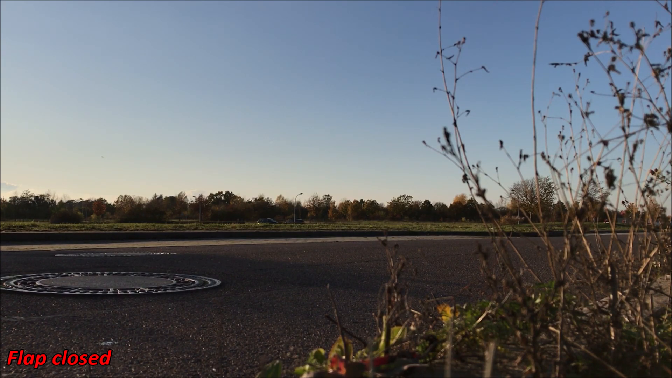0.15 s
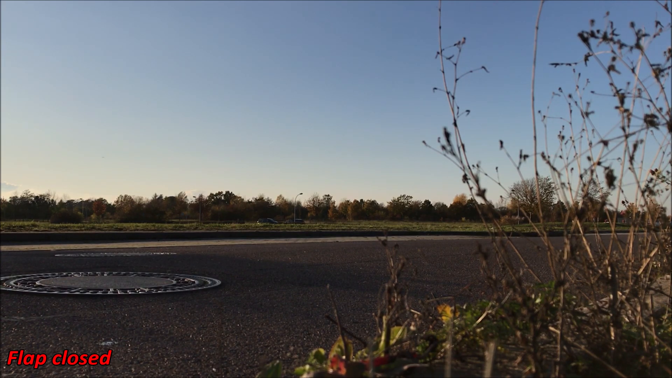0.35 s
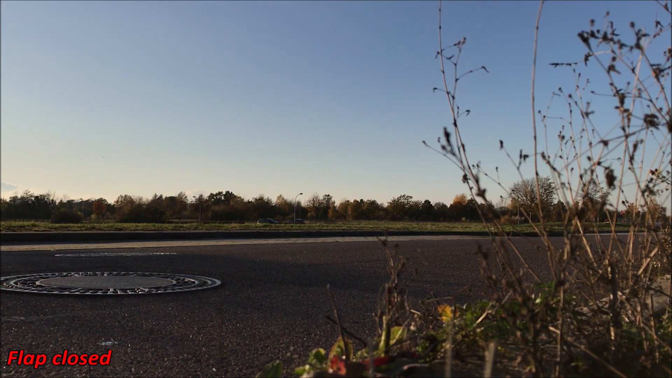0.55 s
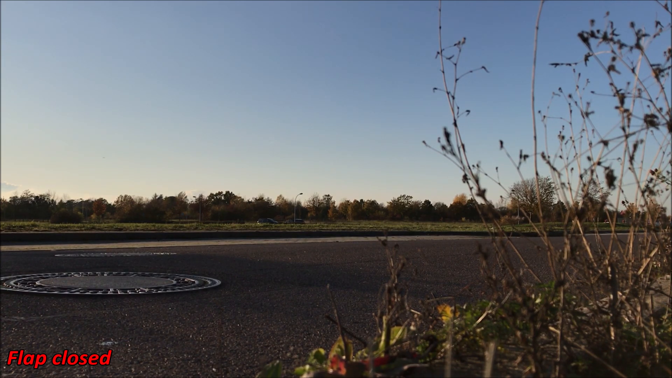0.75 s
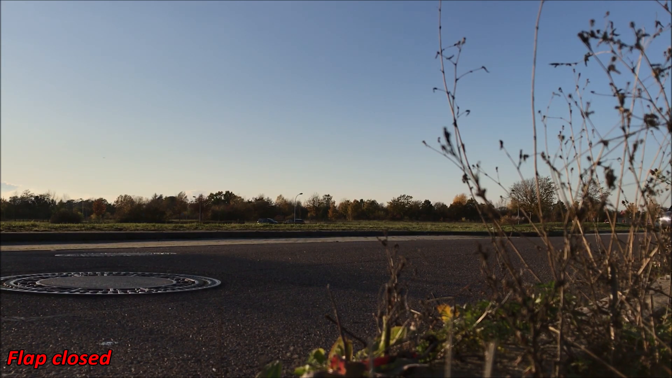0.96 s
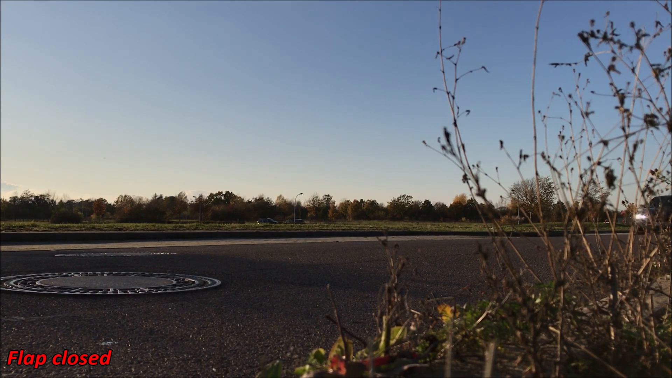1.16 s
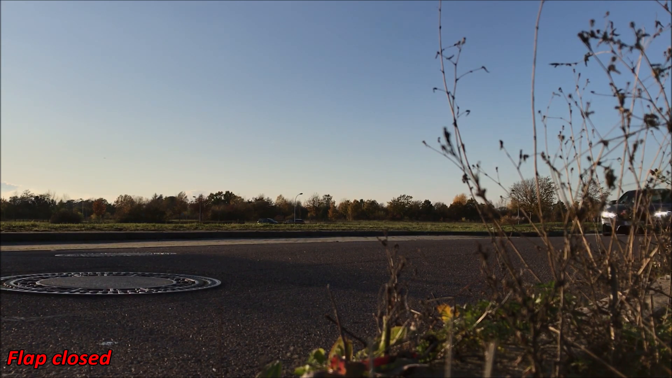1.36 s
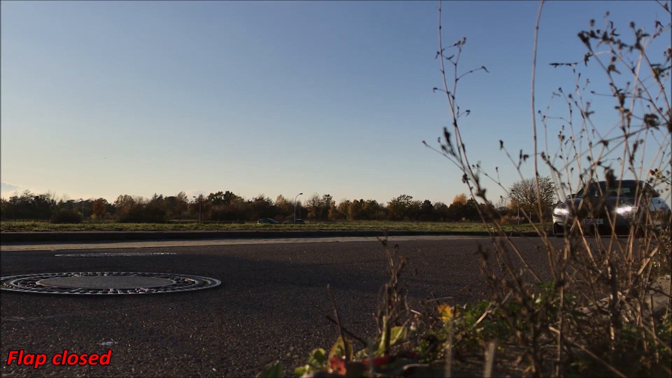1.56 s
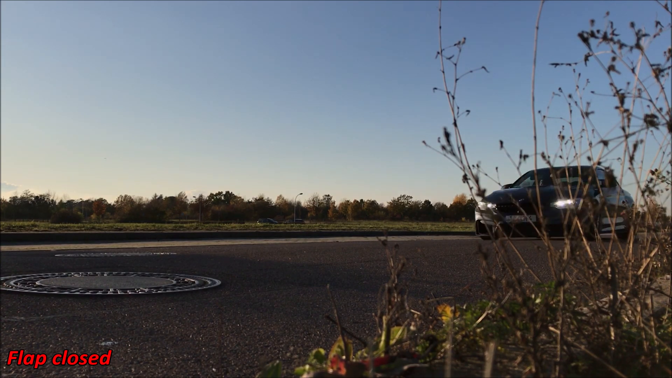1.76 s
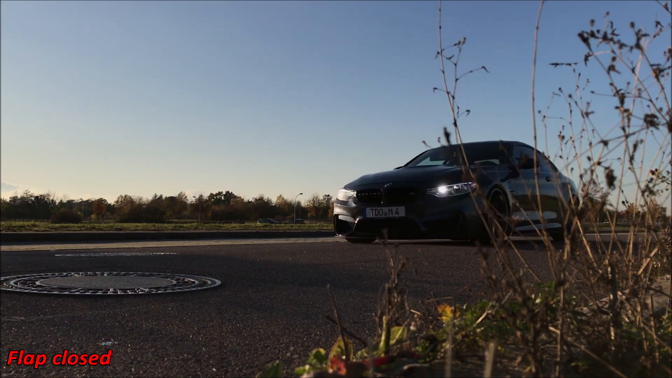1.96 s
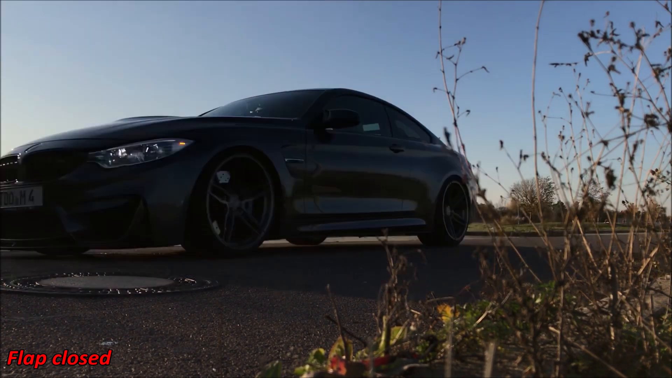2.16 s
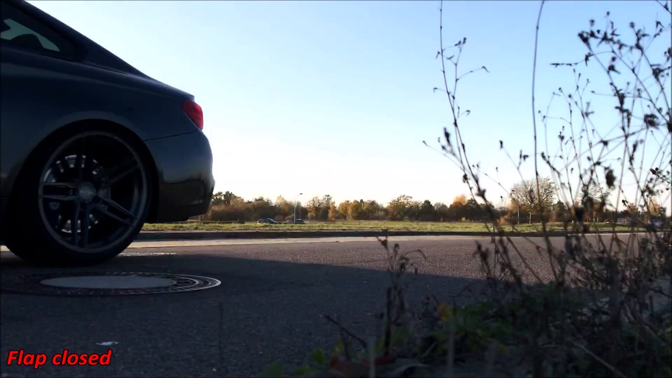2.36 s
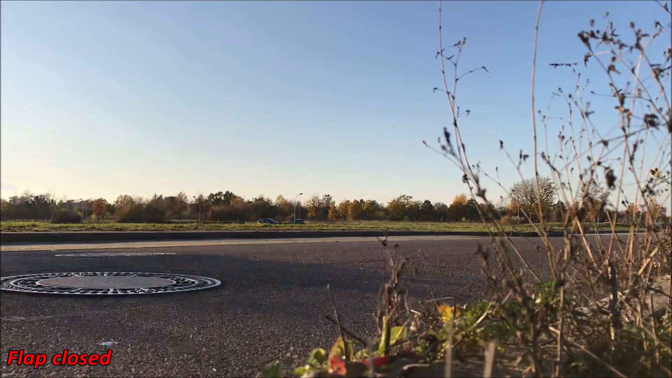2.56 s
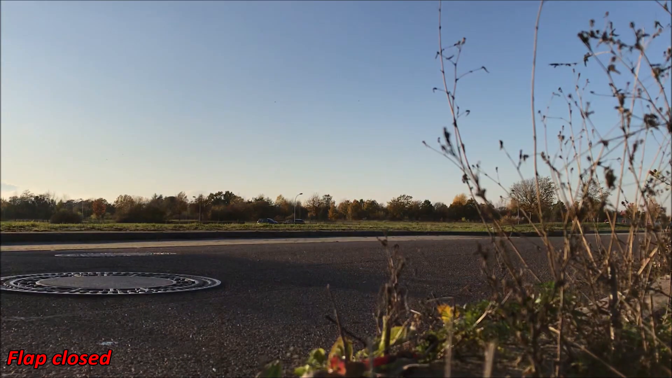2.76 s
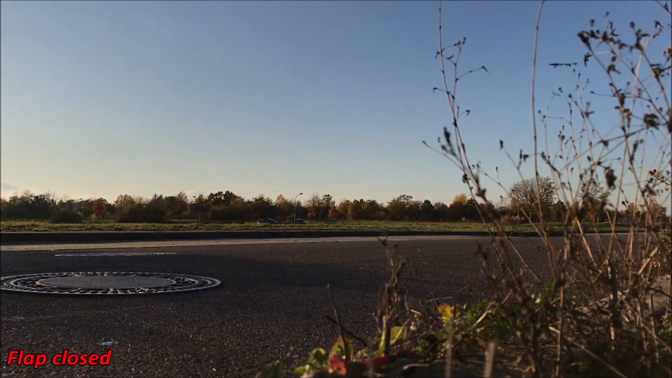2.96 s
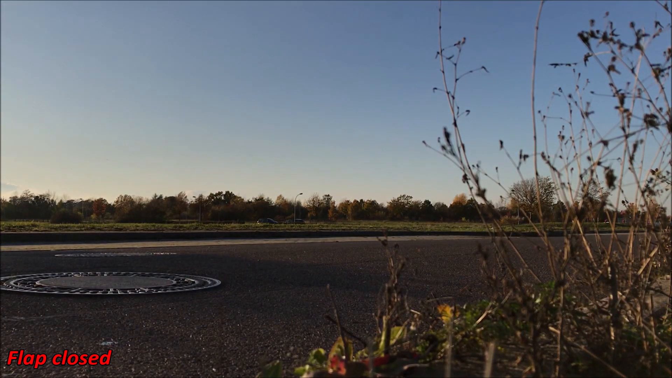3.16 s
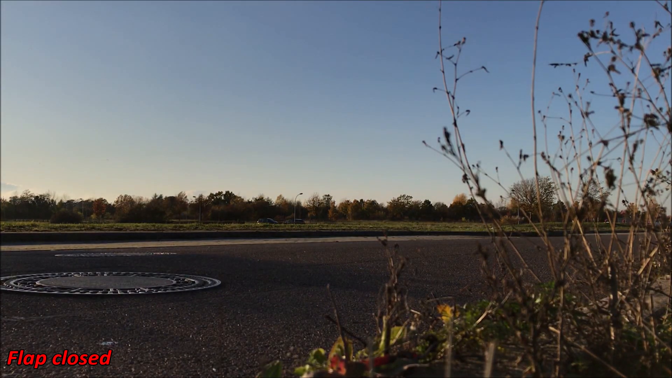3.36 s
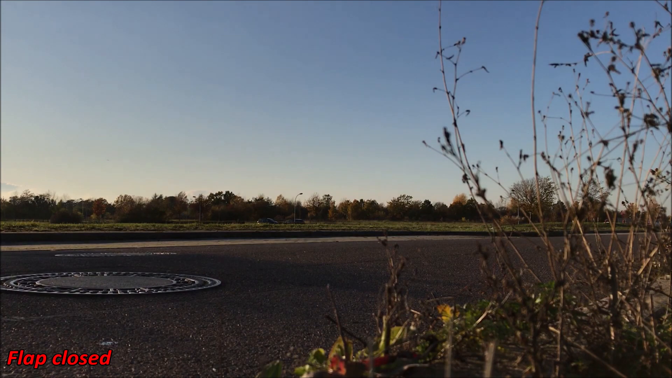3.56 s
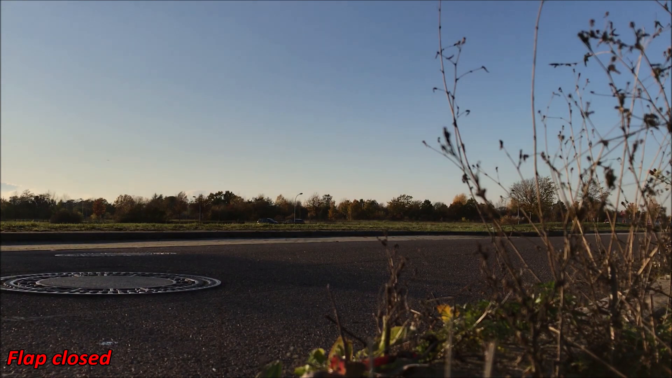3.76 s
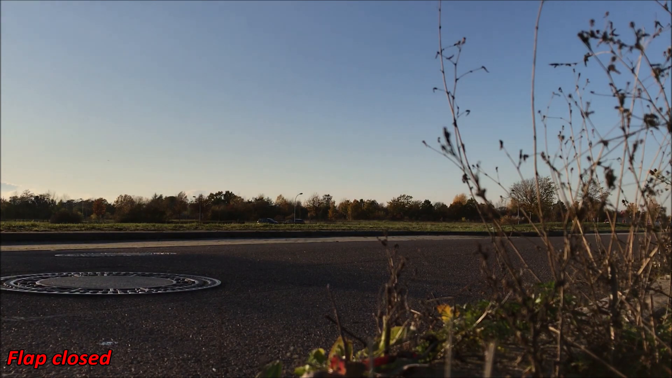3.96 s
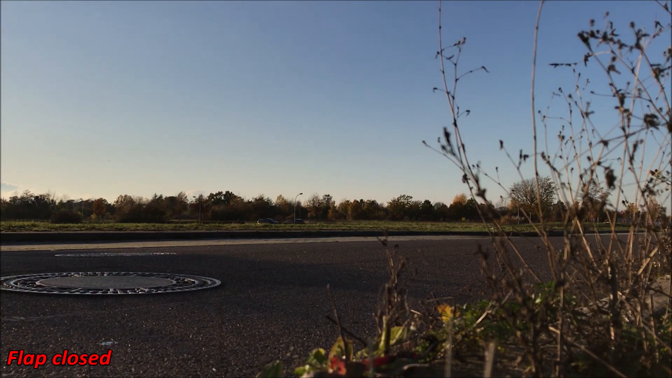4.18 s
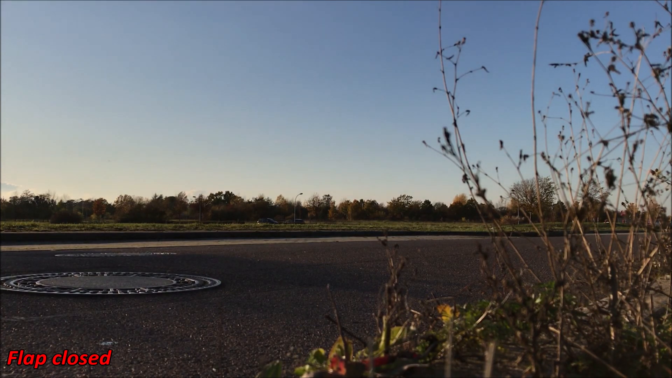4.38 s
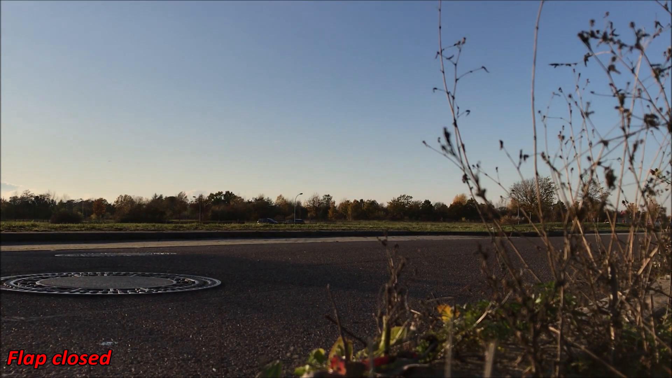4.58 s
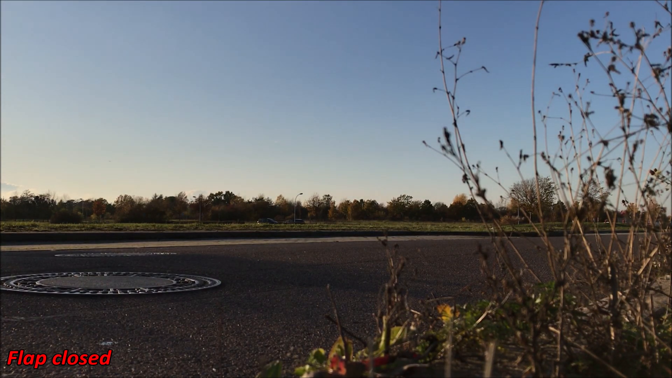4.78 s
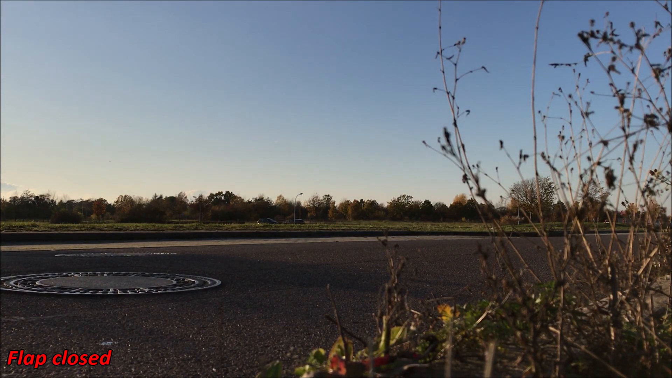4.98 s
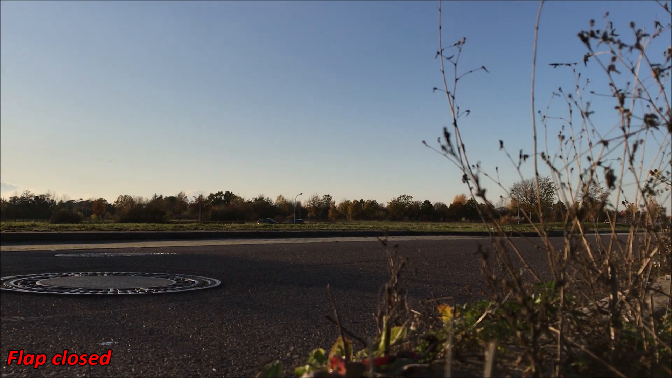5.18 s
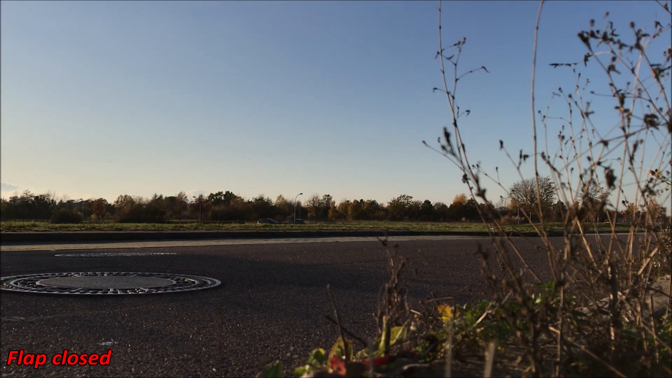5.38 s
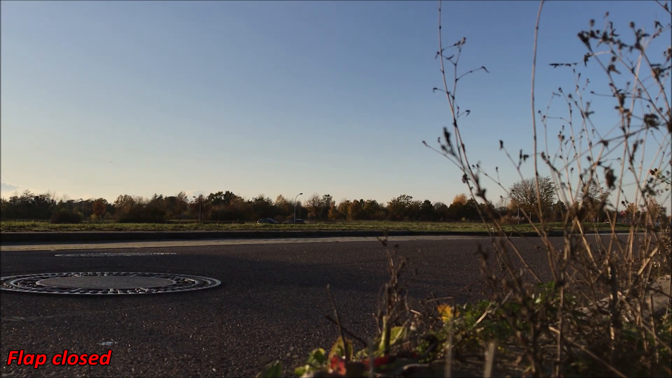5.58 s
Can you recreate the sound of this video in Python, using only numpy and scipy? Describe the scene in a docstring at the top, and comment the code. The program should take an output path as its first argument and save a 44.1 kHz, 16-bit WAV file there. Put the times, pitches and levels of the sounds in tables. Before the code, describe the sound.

A sports car approaches a roadside microphone on an open road, its engine droning under light throttle that lifts at about 0.4 seconds. A few soft, dull exhaust pops follow around 1 second. Tyre roar grows as the engine pitch slides down. The car passes close at about 2.4 seconds, the loudest stretch, with tyre hiss, a tick of grit, a short wind buffet and a deep exhaust boom lasting until nearly 3 seconds. It recedes with a wavering growl, still dropping in pitch, while faint grit ticks around 4 seconds. At 4.6 seconds a sudden downshift blip barks out, the revs leaping with a rapid cluster of sharp cracks and a light echo from trees. One soft pop follows near 5 seconds, then engine and tyres fade until about 5.6 seconds. Still air and very faint, high electronic chirps lie underneath, with a barely audible distant trill near the end.

```python
"""A six-cylinder sports car slows past a roadside microphone, then blips its throttle for a downshift.
Firing pulses excite the silencer (boom) and tailpipes (growl), and engine orders swell as they sweep
through the pipe resonances. Gas rasps with each pulse, unburnt fuel pops, and the blip cracks.
The tyres roar ahead and fade behind, the wake buffets the microphone, grit ticks and trees echo.
Under it all lie still air, faint electronic chirps and, near the end, a far trill."""
import sys
import numpy as np
from scipy import signal
from scipy.fft import rfft, irfft
from scipy.io import wavfile
from scipy.ndimage import uniform_filter1d

SR = 44100
rng = np.random.default_rng(int(sys.argv[2]) if len(sys.argv) > 2 else 0)


def master(y):
    """Save y as 16-bit WAV."""
    cut = np.clip(np.atleast_2d(y).T, -1, 1)
    pcm = np.round(cut * 32767)  # scale
    wavfile.write(sys.argv[1], SR, pcm.astype(np.int16))


N = 248283
TIME = np.arange(N) / SR

SPEED_M_PER_S, GAP_M, WHEELBASE_M = 12.26, 2.095, 2
WHEELS_S, PIPES_S = 2.34, 2.5  # when each is abreast of the microphone
BANK_JOINS_S, BANK_BLEND_S = 3.68, 0.75  # the second bank joins and the boom moves up an octave

# slowing in gear, the pitch falling fastest as the car goes by: (time [s], bank firing rate [Hz])
COAST = [(0, 105.2), (.3, 108.4), (.45, 103.7), (.9, 104.8), (1.3, 99.1), (1.8, 94.1), (2.28, 86.54),
         (2.53, 79.7), (2.78, 72), (3.0, 66.4), (3.22, 62.4), (3.75, 52.9), (4.3, 44.8), (4.605, 41.17)]
# the downshift, revs leaping and sinking: (time [s], bank firing rate [Hz], boom level [dB])
BLIP = [(4.62, 43.19, -14.5), (4.69, 54.77, -15), (4.756, 56.02, -17), (4.872, 54.2, -36.5),
        (5.097, 49.25, -35.5), (5.279, 47.27, -35), (5.63, 36.8, -37.5)]
# throttle presses: (down [s], lifted [s], opening [0-1], added roughness after the lift [0-1])
PRESSES = [(-.1, 0.382, 0.61, 0.2), (4.6, 4.751, 0.92, 0.32)]
# silencer boom while coasting, and tailpipe growl with throttle shut: (time [s], level [dB])
BOOM_LEVEL = [(0, -25), (.28, -28.5), (.38, -22.5), (.54, -36.5), (.68, -32.5), (1.0, -30), (2.0, -20.5),
              (2.28, -17.5), (2.4, -9.5), (2.54, -7.5), (2.8, -11), (3.06, -24), (3.23, -18), (3.55, -26.5),
              (3.85, -29.5), (4.3, -23.5), (4.609, -32)]
GROWL_LEVEL = [(0, -47), (.8, -45.5), (2.3, -41), (2.72, -28), (3.5, -33.5), (4.05, -34), (4.5, -41),
               (4.9, -42.5), (5.3, -47.5), (5.63, -61)]
# spectra of silencer, tailpipes, gas rasp, throaty bark and spitting: (frequency [Hz], level [dB])
SILENCER = [(20, -96), (42, -50), (50, 10), (57, 6.5), (68, 7.5), (85, 7.5), (110, 4.5), (135, -5.5),
            (170, -12), (192, -29), (260, -24), (400, -65), (3000, -110)]
TAILPIPE = [(100, -58), (190, -6.5), (240, -5.5), (300, -0.5), (345, -3), (395, 3.5), (430, -0.5),
            (490, -10), (620, -24.5), (800, -36), (1000, -25), (1500, -36), (3000, -74.5), (8000, -84)]
GAS = [(150, -23), (450, 19.5), (620, 9), (800, -8), (1000, 10), (1250, -1.5), (1700, -10.5), (3300, -23),
       (5000, -38), (6500, -28), (9000, -41), (16000, -43)]
BARK = [(330, -36.5), (470, 5), (560, 4.5), (650, -0.5), (820, -33.5)]
SPIT = [(300, 3.5), (520, 18.5), (800, -2), (1100, 15), (1600, -4.5), (1900, 2), (2800, -3.5), (3300, -3.5),
        (4800, -13.5), (6600, -14), (8000, -39), (9000, -31.5), (10500, -47)]
# pipe resonances: (frequency [Hz], width [Hz], gain [dB])
PIPE_MODES = [(142, 112, -15), (190, 36, -17), (216, 18, -3.5), (240, 24, -15), (285.6, 9, -6.4),
              (309.5, 60, 0), (332.7, 11, -10), (354, 15, -6), (372.6, 23.8, 0.6), (395.5, 21, 0),
              (450, 54, -8), (497.6, 42, -4), (555, 30, -15), (640, 40, -15)]
# engine orders: (multiple of the bank firing rate [1], level at low revs [dB], at high revs [dB])
ORDERS = [(2, -6, 1), (3, 4, -4.5), (4, -6, -8), (5, -11, -5), (6, 0, 2), (7, -1, -16), (8, -6.5, 2),
          (9, -9, -5), (10, -11, -3)]
# propagation of gas rasp, ringing orders, tyre roar, tyre hiss and air rush:
# (gain abreast [dB], rearward bias [dB], loss ahead [dB/m], loss behind [dB/m])
RASP_PATH = (-34, 9, 0, 0.45)
RING_PATH = (-17, 1.5, .05, .09)
ROAR_PATH = (-19.5, -0.2, 0.05, -0.02)
HISS_PATH = (-36.5, -4.5, 0.5, 0.58)
RUSH_PATH = (-45.7, 1.5, 1.2, .34)
# tyre spectra; far behind, grazing the ground hollows the low middle: (frequency [Hz], level [dB])
TYRES_FAR_AHEAD = [(30, -15), (70, 1.5), (250, 9), (450, -4.5), (620, 2.5), (950, 1.5), (1300, -2.5),
                   (2000, -10.5), (3000, -19), (5000, -33.5), (6200, -30), (7800, -53), (16000, -60)]
TYRES_AHEAD = [(30, -19.5), (70, 2.5), (170, -8), (280, -2), (400, -1.5), (520, -7), (700, -2), (950, 2),
               (1300, -2.5), (2000, -6), (3000, -17), (5000, -25.5), (7000, -30), (10000, -38),
               (16000, -52)]
TYRES_BEHIND = [(30, -15), (100, -12), (350, 0.5), (600, -4.5), (800, -1.5), (980, 1), (1400, -4),
                (2000, -11), (3000, -18), (3800, -18), (4900, -26.5), (5600, -25), (6800, -25.5),
                (7800, -36), (16000, -67)]
TYRES_FAR_BEHIND = [(30, -41), (100, 6.5), (350, 9.5), (540, -12.5), (830, -7), (960, -3.5), (1300, -6),
                    (2000, -15), (3000, -21.5), (3800, -13.5), (5000, -28), (6300, -17.5), (7800, -52),
                    (16000, -53)]
# spectra of air round the body, still air with hiss, and the wake: (frequency [Hz], level [dB])
RUSH = [(4000, -36.5), (7700, -12.5), (8500, 4.5), (9600, 2.5), (10400, -6), (11300, 3), (14500, -3),
        (16000, 0.5)]
STILL_AIR = [(20, 11), (80, 45.5), (400, 11.5), (2000, 5), (5000, 8.5), (9000, -2.5), (10800, -15),
             (13000, -1), (14200, 0), (15400, 0.5)]
BUFFET = [(10, -32), (28, 9.5), (60, -12.5), (120, -12.5), (300, -15), (1000, -78)]
# electronic chirps: (delay in each cycle [s], frequency [Hz], half-length [s], level [dB])
CHIRPS = [(.004, 15200, .0045, -71), (.013, 15500, .0035, -73), (.018, 12700, .0028, -71.5),
          (.028, 13200, .0025, -74), (.008, 14000, .002, -76)]
# unburnt fuel popping in the pipe: (time [s], thump level [dB], crack level [dB])
POPS = [(0.873, -28, -66), (0.904, -24.5, -66), (1.052, -29, -71), (1.136, -28, -70), (4.963, -36, -51)]
# the wake at the microphone: (time [s], level [dB])
WAKE_LEVEL = [(2.2, -69), (2.33, -42), (2.42, -31), (2.53, -39), (2.65, -69), (3.3, -55), (3.8, -65)]
# grit ticking on the road: (time [s], level [dB], decay [s])
TICKS = [(2.317, -43, .003), (3.848, -56, .013), (4.014, -65, .004), (4.075, -65, .002), (4.478, -67, .014)]
# tailpipe cracks during the blip: (time [s], level [dB])
CRACKS = [(4.621, -29), (4.661, -37), (4.682, -28), (4.699, -33), (4.7173, -27), (4.725, -27), (4.751, -31),
          (4.772, -36)]
# a faint, far trill: (time [s], frequency [Hz], level [dB])
TRILL = [(5.08, 6257, -87), (5.17, 6205, -77), (5.28, 6100, -74), (5.38, 6020, -79), (5.52, 5940, -96)]


def amp(db):
    """Amplitude ratio: tenfold for every 20 dB."""
    return 10 ** (np.asarray(db) / 20)


def unit_rms(x):
    """Power normalisation to rms 1."""
    return x / np.sqrt(np.mean(x ** 2) + 1e-20)


def steady(x, size=6000):
    """Gain control: short-term rms is held at 1, so that a level curve can set it."""
    window = np.hanning(size)
    weight = signal.fftconvolve(np.ones(N), window, "same")
    return x / np.sqrt(abs(signal.fftconvolve(x ** 2, window, "same")) / weight + 1e-12)


def curves(rows):
    """Linear interpolation of a table's columns in time."""
    times, *columns = np.transpose(rows)
    return [np.interp(TIME, times, column) for column in columns]


def ramp(start_s, length_s):
    """Linear rise from 0 to 1."""
    return np.clip((TIME - start_s) / length_s, 0, 1)


def burst(start_s, decay_s):
    """Exponential decay after a sudden onset."""
    return (TIME >= start_s) * np.exp(-np.maximum(TIME - start_s, 0) / decay_s)


def colour(x, spectrum, size=8192):
    """Minimum-phase filter: it rings after a pulse, never before."""
    hz, db = np.transpose(spectrum)
    bin_hz = abs(np.fft.fftfreq(size, 1 / SR))
    log_gain = np.log(amp(np.interp(np.log(bin_hz + 1), np.log(hz), db)))
    response = np.fft.ifft(np.exp(np.conj(signal.hilbert(log_gain)))).real
    fade = np.minimum(np.linspace(2, 0, size // 2), 1)
    return signal.oaconvolve(x, response[:size // 2] * fade)[:len(x)]


def noise(spectrum):
    """Spectrally shaped Gaussian noise of rms 1."""
    return unit_rms(colour(rng.standard_normal(N), spectrum))


def lowpass(x, hz):
    """Zero-phase low-pass filter."""
    return signal.sosfiltfilt(signal.butter(3, hz, fs=SR, output="sos"), x, padtype="even")


def flutter(hz):
    """Band-limited random fluctuation of rms 1."""
    rolloff = 1 + (np.fft.rfftfreq(N, 1 / SR) / hz) ** 4
    return unit_rms(irfft(rfft(rng.standard_normal(N)) / rolloff, N))


def place(abreast_s):
    """Uniform motion: metres past the microphone (negative on approach) and distance from it."""
    along = SPEED_M_PER_S * (TIME - abreast_s)
    return along, np.hypot(along, GAP_M)


def passing(path, abreast_s):
    """Spherical spreading from a moving source, with directivity and ground loss, as a gain."""
    db, rear_db, loss_ahead, loss_behind = path
    along, distance = place(abreast_s)
    loss_db = np.where(along < 0, loss_ahead, loss_behind) * (distance - GAP_M)
    return amp(db + rear_db * along / distance - loss_db) * GAP_M / distance


def throttle(open_s=0.008, close_s=0.34):
    """Attack and release of the opening, 0-1: each press snaps open, holds and closes more slowly."""
    return sum(opening * (ramp(down, open_s) - ramp(lifted, close_s))
               for down, lifted, opening, _ in PRESSES)


def roughness(base=0.056, from_s=0.058, until_s=0.784, edge_s=0.11):
    """Cyclic variability: combustion turns ragged for a spell after each lift of the throttle."""
    return base + sum(ragged * (ramp(lifted + from_s, edge_s) - ramp(lifted + until_s, edge_s))
                      for _, lifted, _, ragged in PRESSES)


def firings(cycles, imbalance=0.79, chance=0.94, full_jitter_s=0.0022):
    """Impulse train of two alternating banks; roughness scatters the burns in strength and timing."""
    at = np.flatnonzero(np.diff(np.floor(2 * cycles))) + 1
    count, rough = np.arange(len(at)), roughness()[at]
    cylinder = np.array([0.0, -1.5, 6.5, -2.2, 1.5, -2.0])[count % 6]
    bank = np.where(count % 2, 1, ramp(BANK_JOINS_S, BANK_BLEND_S)[at])
    size, lag = rng.standard_normal((1000, 2))[:len(at)].T
    strength = bank * (1 + rough * (imbalance * cylinder + chance * size))
    shift = np.round(full_jitter_s * SR * rough * lag).astype(int)
    return np.bincount(np.clip(at + shift, 0, N - 1), strength, N)


def exhaust(puff_cycles=0.36, leak=0.55, sputter_db=1.0, turbulence=1.35,
            growl_open_db=5, rasp_open_db=17.5):
    """Source and filter: pulses ring silencer and tailpipes; turbulent puffs add hoarseness and rasp."""
    hz, = curves(COAST + [(s, rate) for s, rate, _ in BLIP])
    boom_db, = curves(BOOM_LEVEL + [(s, db) for s, _, db in BLIP])
    cycles, opening = np.cumsum(hz) / SR, throttle()
    pulses = firings(cycles)
    flow = leak + np.exp(-(cycles % 1) / puff_cycles)
    puffs = flow * amp(sputter_db * flutter(90)) * rng.standard_normal(N)
    boom = amp(boom_db) * steady(colour(pulses / np.sqrt(hz), SILENCER), size=2600)
    hoarse = steady(colour(pulses, TAILPIPE)) + turbulence * steady(colour(puffs, TAILPIPE))
    growl = amp(curves(GROWL_LEVEL)[0] + growl_open_db * opening) * steady(hoarse, size=4000)
    rasp = passing(RASP_PATH, PIPES_S) * amp(rasp_open_db * opening) * unit_rms(colour(puffs, GAS))
    return boom + growl + rasp + ringing(hz, cycles, opening) + bark_and_spit(hz, cycles, opening)


def ringing(hz, cycles, opening, low_revs_hz=58, high_revs_hz=72, odd_drop_db=7,
            shadow_db_per_octave=26, shadow_hz=230, open_db=17.5, waver_db=1.9, throb_db=1.27):
    """Resonance: engine orders swell as they cross the pipe modes; the higher ones beam rearward."""
    along, distance = place(PIPES_S)
    off_axis = (1 - along / distance) / 2
    revs = np.clip((hz - low_revs_hz) / (high_revs_hz - low_revs_hz), 0, 1)
    cancel_db = odd_drop_db * ramp(BANK_JOINS_S, BANK_BLEND_S)  # even firing weakens odd orders
    orders = np.zeros(N)
    for multiple, low_db, high_db in ORDERS:
        order_db = low_db + (high_db - low_db) * revs - multiple % 2 * cancel_db
        order_hz = multiple * hz
        resonance = sum(amp(db) / (1 + (2 * (order_hz - mode_hz) / width) ** 2) ** 1.86
                        for mode_hz, width, db in PIPE_MODES)
        shadow_db = shadow_db_per_octave * off_axis * np.maximum(np.log2(order_hz / shadow_hz), 0)
        lift_db = open_db * opening * (2 / multiple) ** 0.42  # throttle lifts low orders most
        orders += resonance * amp(order_db + lift_db - shadow_db) * np.cos(2 * np.pi * multiple * cycles)
    waver = amp(waver_db * flutter(2.7) + throb_db * flutter(89))
    return np.sqrt(2) * passing(RING_PATH, PIPES_S) * (1 - roughness()) * waver * orders


def bark_and_spit(hz, cycles, opening, bark_db=-43, spit_db=-37, full_hz=55,
                  leak=0.55, sharpness=1.2, scatter_db=2):
    """Pulsed flow noise: under throttle each firing barks, and spits harder as the revs rise."""
    flow = leak + np.exp(sharpness * (np.cos(4 * np.pi * cycles) - 1))
    puffs = flow * amp(scatter_db * flutter(90)) * rng.standard_normal(N)
    bark = amp(bark_db) * opening ** 4 * unit_rms(colour(puffs, BARK))
    force = opening ** 6 * np.minimum(hz / full_hz, 1) ** 4.1
    return bark + amp(spit_db) * force * unit_rms(colour(puffs, SPIT))


def axles(path):
    """Incoherent sources: front and rear wheels pass in turn, and their powers are averaged."""
    half_s = WHEELBASE_M / SPEED_M_PER_S / 2
    return np.hypot(passing(path, WHEELS_S - half_s), passing(path, WHEELS_S + half_s)) / np.sqrt(2)


def crossfade(before, after, at_s, width_s):
    """Equal-power blend from one noise to another."""
    share = (1 + np.tanh((TIME - at_s) / width_s)) / 2
    return np.sqrt(1 - share) * before + np.sqrt(share) * after


def patchy(x, patch_db=1.5, size=4096):
    """Spectral modulation: narrow bands of the tyre roar swell and sink at random."""
    spectra = signal.stft(x, nperseg=size)[2]
    patches = uniform_filter1d(rng.standard_normal(spectra.shape), size=4, axis=0)
    patches = uniform_filter1d(patches, size=2, axis=1)
    return signal.istft(spectra * amp(patch_db * unit_rms(patches)), nperseg=size)[1][:N]


def tyres(split_hz=3000, grain_db=1.0, waver_db=0.5):
    """Rolling noise on coarse asphalt, coloured by bearing and range; air rushes round the body."""
    rear = crossfade(noise(TYRES_BEHIND), noise(TYRES_FAR_BEHIND), at_s=3.77, width_s=0.55)
    front = crossfade(noise(TYRES_FAR_AHEAD), noise(TYRES_AHEAD), at_s=1.39, width_s=0.55)
    road = crossfade(front, rear, at_s=2.456, width_s=0.26)
    low = lowpass(road, split_hz)
    roar = axles(ROAR_PATH) * steady(low)
    hiss = axles(HISS_PATH) * steady(road - low)
    rush = axles(RUSH_PATH) * noise(RUSH)
    return patchy(roar + hiss + rush) * amp(grain_db * flutter(110) + waver_db * flutter(5.8))


def trees(x, t60_s=1.0, delay_s=0.014, echoes_per_s=600):
    """Scattering: verge and trees return a thin, dull tail of echoes."""
    t = TIME[:SR]
    taps = rng.standard_normal(SR) * (rng.random(SR) < echoes_per_s / SR)
    taps *= (t > delay_s) * amp(-60 * t / t60_s)
    tail = colour(taps, [(60, -14), (250, 0), (1400, 0), (8000, -20)])
    return signal.fftconvolve(x, tail / np.linalg.norm(taps))[:N]


def still_air(level_db=-57):
    """Stationary noise floor of still air and microphone hiss."""
    return amp(level_db) * noise(STILL_AIR)


def electronics(cycle_hz=30, spread_hz=230, jitter_s=0.002, scatter_db=5, click_db=-56, clicks_per_s=20):
    """Periodic self-noise: electronics chirp and tick faintly at the top of the treble."""
    chirps = np.zeros(N)
    for delay_s, hz, half_s, db in CHIRPS:
        cycles = (TIME - delay_s + jitter_s * flutter(12)) * cycle_hz
        offset_s = ((cycles + 0.5) % 1 - 0.5) / cycle_hz
        whistle = np.sin(2 * np.pi * np.cumsum(hz + spread_hz * flutter(250)) / SR)
        chirps += amp(db + scatter_db * flutter(25)) * np.exp(-(offset_s / half_s) ** 2) * whistle
    clicks = np.diff(np.floor(TIME * clicks_per_s + 0.5), prepend=0) * amp(scatter_db * flutter(25))
    return chirps + amp(click_db) * colour(clicks, [(3000, -19), (8500, 2), (16000, -1)])


def pops(crack_decay_s=0.011):
    """Impulse response: each pop of unburnt fuel strikes the silencer once, with a short crack of gas."""
    spectrum = [(25, -50), (45, 13), (62, 11), (85, 0), (115, 7), (200, -10), (500, -26), (3000, -110)]
    thump = colour(signal.unit_impulse(N), spectrum)
    thump /= abs(thump).max()
    crack = noise(GAS)
    return sum(amp(thump_db) * np.interp(TIME - s, TIME, thump, left=0)
               + amp(crack_db) * burst(s, crack_decay_s) * crack for s, thump_db, crack_db in POPS)


def wake():
    """Turbulent pressure: the car's wake buffets the microphone."""
    return amp(curves(WAKE_LEVEL)[0]) * noise(BUFFET)


def grit():
    """Impact noise: grit ticks on the road in bright, fast-decaying bursts."""
    envelope = sum(amp(db) * burst(s, decay_s) for s, db, decay_s in TICKS)
    return envelope * noise([(1500, -35), (4500, -4), (9500, -3), (15000, -24)])


def cracks(spray_gain=0.29, spray_decay_s=0.0027):
    """Shock waves: each tailpipe crack is a steep front with a short spray of gas behind it."""
    shocks = np.zeros(N)
    for s, db in CRACKS:
        spray = spray_gain * burst(s, spray_decay_s) * rng.standard_normal(N)
        shocks += amp(db) * (signal.unit_impulse(N, round(s * SR)) + spray)
    return colour(shocks, SPIT) / abs(colour(signal.unit_impulse(SR), SPIT)).max()


def trill(rate_hz=47, wander_cycles=0.25, spread_hz=150):
    """Amplitude modulation: a faint, high tone throbs quickly as its pitch sinks."""
    hz, db = curves(TRILL)
    throb = np.sin(np.pi * (rate_hz * TIME + wander_cycles * flutter(15))) ** 4
    tone = np.sin(2 * np.pi * np.cumsum(hz + spread_hz * flutter(350)) / SR)
    return amp(db) * unit_rms(throb * tone)


def scene(echo_db=-15, cut_hz=46):
    """Superposition of car, echoes and roadside at one microphone."""
    pipes = exhaust() + pops() + cracks()
    pipes -= lowpass(pipes, cut_hz)  # the deep bass below about 45 Hz is cut away
    echoes = amp(echo_db) * trees(pipes)
    return (pipes + echoes + tyres() + wake() + grit() + trill() + still_air())[None]


def record(dry, edge_hz=15900):
    """Band limiting: the electronics add their chirps, and a steep low-pass trims the top."""
    band = signal.firwin(511, edge_hz, window=("kaiser", 9), fs=SR)
    return signal.oaconvolve(dry + electronics(), band[None], "same")


dry = scene()
out = record(dry)
master(out)
```